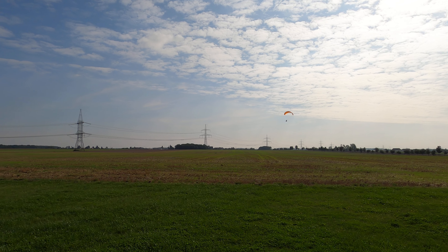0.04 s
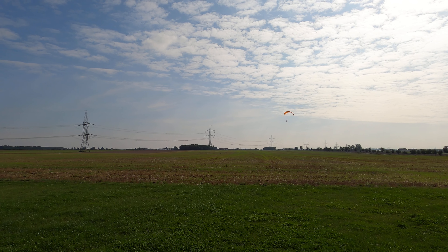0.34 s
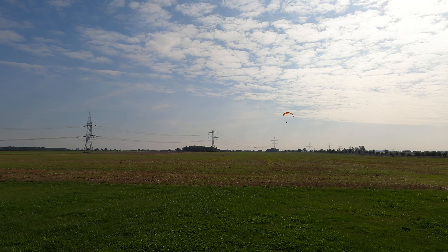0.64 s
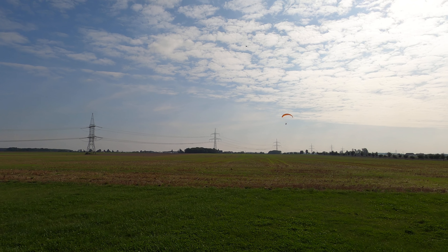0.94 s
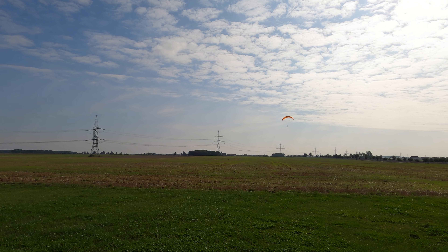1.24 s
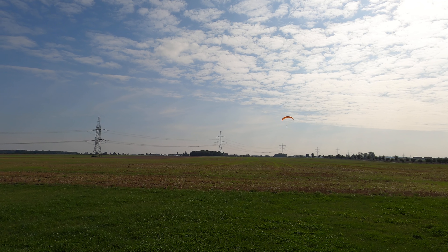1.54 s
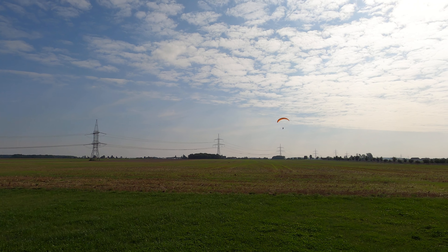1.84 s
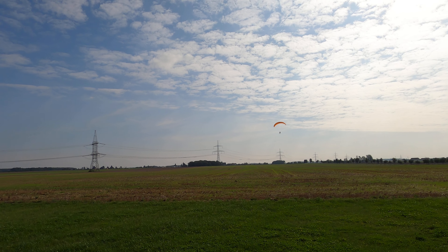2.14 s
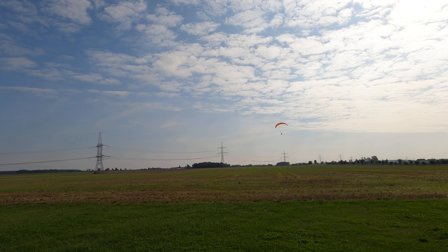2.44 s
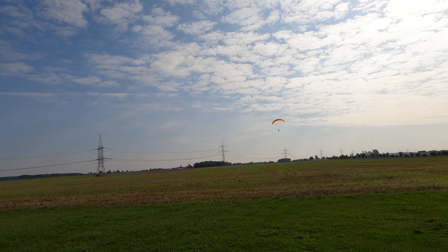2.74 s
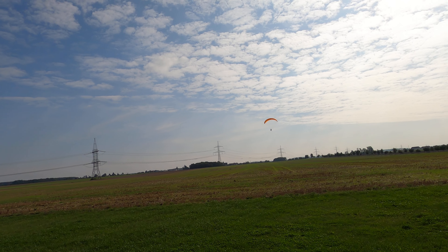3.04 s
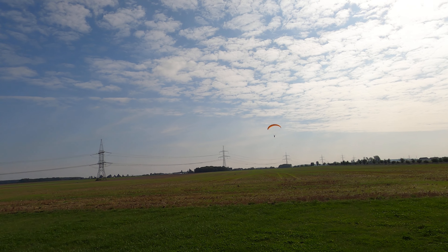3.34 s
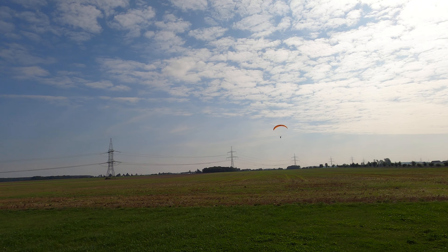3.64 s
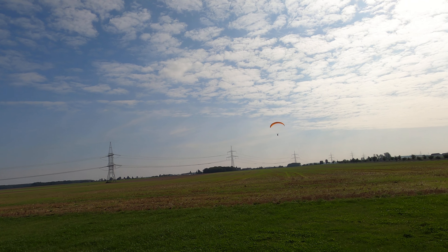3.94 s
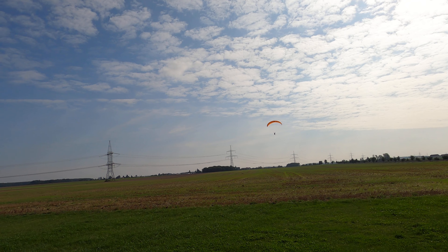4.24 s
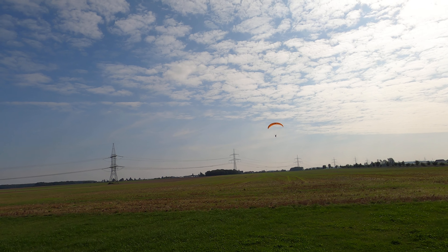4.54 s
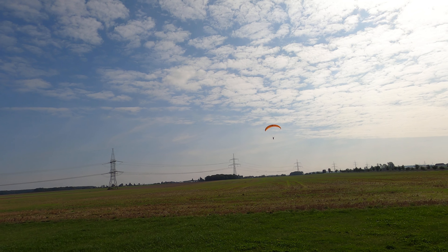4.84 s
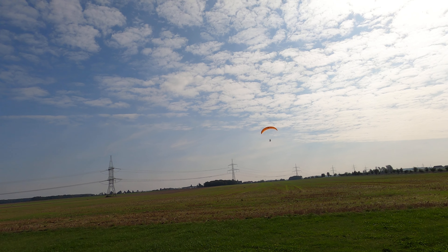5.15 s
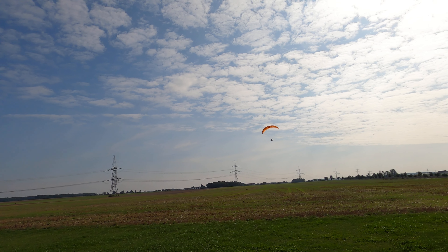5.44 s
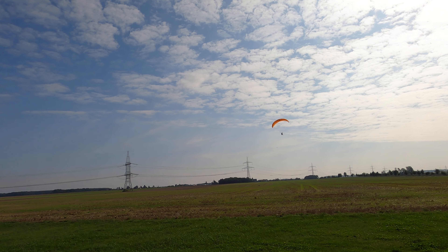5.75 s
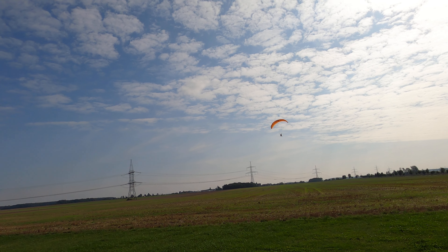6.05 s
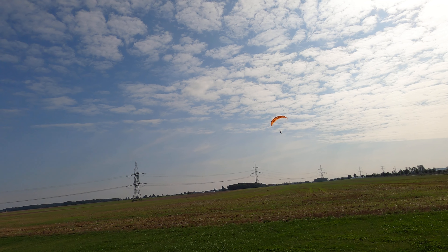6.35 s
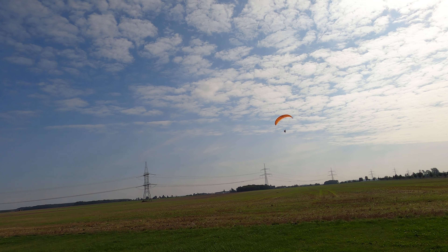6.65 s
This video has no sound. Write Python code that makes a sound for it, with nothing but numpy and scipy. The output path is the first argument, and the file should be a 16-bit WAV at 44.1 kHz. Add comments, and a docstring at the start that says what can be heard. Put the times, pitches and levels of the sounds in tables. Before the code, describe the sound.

Wind buffets the microphone in an open field with low, uneven rumbles and soft thumps, mostly on the left. Beneath it a distant powered paraglider drones faintly, its propeller hiss slowly brightening as it approaches. A soft tick and a few very faint bird chirps pass midway. The hardest gust hits late, and just afterwards the engine drops slightly in pitch while the gusts continue.

```python
"""Wind buffets the microphone in an open field, over the faint drone and rush of a powered paraglider.
The glider approaches high overhead and throttles back a little near the end. Its propeller rush mixes
with its own ground reflection, so that broad notches sweep slowly downwards. The gusts rumble hardest
on the exposed left port of the stereo pair. A few soft ticks and a far bird's chirps lie behind."""
import sys
import numpy as np
from scipy import signal
from scipy.fft import rfft, irfft, next_fast_len
from scipy.io import wavfile
from scipy.ndimage import uniform_filter1d

SR = 44100
rng = np.random.default_rng(int(sys.argv[2]) if len(sys.argv) > 2 else 0)


def generate_wav(signal):
    """Clip the signal to [-1, 1] and save it as 16-bit WAV at the path in sys.argv[1]."""
    frames = np.transpose(np.atleast_2d(signal))
    scaled = np.clip(frames, -1, 1) * 32767
    pcm = np.round(scaled).astype(np.int16)
    wavfile.write(sys.argv[1], SR, pcm)


N = 300321
TIME = np.arange(N) / SR
SIZE = next_fast_len(N)
FREQS = np.maximum(np.arange(SIZE // 2 + 1) * SR / SIZE, 1)

# the hardest eddies that strike the left port: t/s, level/dB, centre f/Hz
BUFFETS = [(0.042, -26, 85), (0.192, -18.5, 87), (0.211, -19.5, 88), (0.246, -20.5, 86.4),
           (0.318, -20, 85.4), (0.336, -19.5, 93), (0.384, -30, 93), (0.428, -24, 85.5),
           (0.448, -28.5, 146), (0.627, -22.5, 88), (0.652, -29, 120), (0.743, -31, 121),
           (0.759, -20.5, 89), (1.039, -28, 97), (1.105, -28.5, 116), (1.431, -22, 126),
           (1.488, -20.5, 111), (1.532, -19.5, 135), (1.702, -22.5, 83), (1.764, -20.5, 85.5),
           (1.788, -15.5, 100), (1.832, -19, 103), (1.909, -16, 110.5), (2.011, -21.5, 85),
           (2.111, -14.5, 115), (2.136, -21.5, 76), (2.235, -19.5, 77.4), (3.215, -22, 51.6),
           (3.335, -16, 76), (3.369, -28, 114), (3.446, -14.5, 93), (3.459, -19.5, 119),
           (3.491, -25.5, 108), (3.532, -14.5, 128.3), (3.701, -12.5, 112.6), (3.827, -20.5, 82),
           (3.863, -27, 128), (3.911, -20, 94), (3.98, -22, 107), (4.776, -17, 119), (4.885, -26, 127),
           (4.922, -17.5, 85), (4.94, -13.5, 132), (4.957, -19, 200), (4.974, -3.5, 207.4),
           (4.994, -9, 159), (5.019, -11, 146), (5.037, -11.5, 154), (5.063, -7.5, 120), (5.091, -19, 118),
           (5.164, -13.5, 122.5), (5.719, -17, 113), (5.743, -22.5, 166), (5.763, -23.5, 117),
           (5.856, -21.5, 100), (5.915, -9.5, 97), (5.937, -14.5, 86), (6.004, -17, 145), (6.073, -19, 109)]


def engine_firing(unsteadiness=0.00092):
    """The engine runs almost steadily, then throttles back: firing phase, firing rate, drone level."""
    # t/s, firing f/Hz, drone level/dB
    throttle = [(0, 145.3, -9.5), (1.2, 145.1, -0.5), (2.2, 144.5, -2.5), (3.2, 145.5, 3), (3.9, 145.4, 3),
                (4.2, 144.4, 4), (4.48, 145, 6), (4.73, 146.1, 4.5), (4.81, 144.8, -3), (4.95, 144.2, 6.5),
                (5.06, 144.6, 1), (5.11, 140.3, 1), (5.2, 134, 0), (5.45, 134.5, 3.5), (5.68, 134.3, -3),
                (6.15, 135, 2), (6.35, 133.9, 1), (6.6, 134.3, 5.5), (6.81, 134.5, -1.5)]
    firing_hz, level_db = in_time(throttle)
    phase = 2 * np.pi * np.cumsum(firing_hz * (1 + unsteadiness * drift(8.4))) / SR
    return phase, firing_hz, level_db


def exhaust_drone(phase, firing_hz, level_db, waver_db=2.06, half_order_db=-15):
    """Exhaust harmonics waver in the moving air, the high ones smeared most."""
    # exhaust colour from far below: f/Hz, level/dB
    colour = [(140, -70.5), (280, -90), (430, -88), (580, -79.5), (720, -82.5), (810, -79), (870, -85),
              (940, -74), (1010, -72), (1080, -73), (1160, -76.5), (1320, -80), (1450, -81), (1700, -82.5),
              (2100, -100), (3200, -100)]
    out = np.zeros(N)
    smear_rad = 0.011 + 0.0045 * (firing_hz.max() - firing_hz)   # less even when throttled back
    for k in range(1, 21):
        harmonic = np.sin(k * (phase + smear_rad * drift(11.4)) + 2 * np.pi * rng.random())
        half_order = from_db(half_order_db) * np.sin((k + .5) * phase + 2 * np.pi * rng.random())
        harmonic_db = at_hz(colour, k * firing_hz)[0] + waver_db * drift(3.2)
        out += from_db(harmonic_db) * (harmonic + half_order)
    return np.sqrt(2) * from_db(level_db) * out


def propeller_rush(phase, split_hz=5000, throb=0.17, sharpness=11.0, uneven=0.85, flutter_db=0.5):
    """Two unrelated streams of propeller noise pulse with each firing; the treble grows as it nears."""
    # t/s, body level/dB, treble level/dB
    approach = [(0.0, -63.5, -77), (0.7, -66.5, -74.5), (0.9, -64, -75.5), (1.2, -62, -75),
                (1.55, -63.5, -70), (1.9, -65, -70.5), (2.25, -63, -72.5), (2.5, -60.5, -72),
                (2.82, -60.5, -68.5), (3.55, -60.5, -67.5), (4.48, -59, -66.5), (5.0, -60.5, -68),
                (5.3, -62.5, -69), (5.58, -60.5, -67), (5.92, -60, -65.5), (6.81, -60.5, -68.5)]
    # colour of the rush: f/Hz, level/dB
    colour = [(100, 12.5), (350, 4.5), (700, -1), (1100, 4), (1500, 2), (1950, 1.5), (2350, 3), (2800, 0),
              (3300, 2.5), (3900, 3), (4800, -2), (5250, -3), (5900, -5.5), (6500, -6), (7850, -11),
              (8650, -9), (10600, -18.5), (12500, -24), (14700, -33)]
    body_db, treble_db = in_time(approach)
    low_share = lowpass(split_hz, 8)
    firings = np.exp(sharpness * np.cos(phase)) * (1 + uneven * np.cos(phase / 2))   # strong, then weak
    pulsing = rms_one(1 + throb * rms_one(firings))
    streams = []
    for _ in range(2):
        body = from_db(body_db + 2.0) * noise(gains(colour) * np.sqrt(low_share))
        treble = from_db(treble_db + 3.5) * noise(gains(colour) * np.sqrt(1 - low_share))
        streams.append(body + treble)
    return np.array(streams) * pulsing * from_db(flutter_db * drift(8.8))


def over_ground(direct, scatter_above_hz=4600, scatter_db_per_ms=10):
    """The ground reflection trails further behind the direct sound, and dulls, as the glider rises."""
    # reflection at the microphone: t/s, delay/ms, relative strength
    bounce = [(0, 1.11, 0.38), (0.8, 1.16, 0.51), (1.15, 1.19, 0.28), (2.0, 1.25, 0.52), (2.6, 1.32, 0.22),
              (3.2, 1.32, 0.34), (3.8, 1.4, 0.16), (4.4, 1.56, 0.3), (4.7, 1.54, 0.35), (5.0, 1.7, 0.34),
              (5.3, 1.8, 0.63), (5.9, 1.97, 0.42), (6.2, 2.15, 0.34), (6.5, 2.3, 0.44), (6.81, 2.4, 0.42)]
    # what the grass sends back: f/Hz, level/dB
    grass = [(150, -10), (600, -2.5), (1200, 2.5), (2400, 0.5), (4700, -3), (7000, -2.5), (12000, -12)]
    delay_ms, strength = in_time(bounce)
    earlier = TIME - delay_ms / 1000
    straight = np.interp(earlier, TIME, filtered(direct, gains(grass)))
    turned = np.interp(earlier, TIME, filtered(direct, -1j * gains(grass)))
    lag_rad = 3.25 - 1.31 * delay_ms   # soft ground turns the phase, less as the angle steepens
    echo = np.cos(lag_rad) * straight + np.sin(lag_rad) * turned
    dull = filtered(echo, lowpass(scatter_above_hz, 8))
    treble_kept = from_db(-scatter_db_per_ms * (delay_ms - delay_ms.min()))   # grass scatters the rest
    return direct + strength * (dull + (echo - dull) * treble_kept)


def swells_and_brushes():
    """Narrow bands of noise swell and fade, with three faint, brushing ticks."""
    # the three shortest are the ticks: t/s, half length/s, level/dB, centre f/Hz, half width/Hz
    bands = [(1.55, 0.27, -66.5, 1500, 230), (1.597, 0.14, -72, 3930, 200),
             (2.497, 0.043, -65, 1550, 200.4), (2.837, 0.1, -65.5, 396, 60), (4.206, 0.1, -69, 485, 109.9),
             (4.95, 0.12, -63.5, 1580, 130), (5.365, 0.018, -59.5, 1150, 330),
             (5.444, 0.093, -69, 1000, 100), (5.533, 0.0074, -55, 943, 330),
             (6.284, 0.0078, -58.5, 945, 380.3), (6.5, 0.23, -72.5, 840, 80)]
    out = np.zeros(N)
    for at, half_s, db, hz, half_hz in bands:
        out += from_db(db) * bell(TIME, at, half_s) * noise(bell(FREQS, hz, half_hz))
    return out


def rush_arch(half_width_hz=110):
    """A narrow band of the rush glides up and back as it swells."""
    # t/s, centre f/Hz, level/dB
    glide = [(5.26, 1450, -71), (5.37, 1540, -63), (5.44, 1710, -60.5), (5.5, 1690, -65), (5.62, 1560, -64),
             (5.74, 1460, -66), (5.85, 1400, -79)]
    hz, db = in_time(glide)
    band = noise(bell(FREQS, 0, half_width_hz))
    sounding = (TIME > glide[0][0]) & (TIME < glide[-1][0])
    return sounding * from_db(db) * np.sqrt(2) * band * np.sin(2 * np.pi * np.cumsum(hz) / SR)


def hiss_dip(x, at_s=5.16, half_s=0.07, depth_db=-4.5, centre_hz=5600, half_width_hz=1100):
    """One band of the hiss sinks briefly and comes back."""
    band = filtered(x, bell(FREQS, centre_hz, half_width_hz))
    return x + band * (from_db(depth_db * bell(TIME, at_s, half_s)) - 1)


def wind():
    """Each port has its own rumble; the upper part of the left port's buffeting crosses to the right."""
    # left port into right channel: f/Hz, level/dB
    crossfeed = [(40, -47), (90, -33.5), (130, -12), (180, -2), (240, -3.5), (330, 2.5), (600, 10.5),
                 (1000, -17), (3000, -29)]
    exposed, sheltered = gust_strength()
    left = from_db(1.02) * rumble(exposed) + puffs(BUFFETS, swings=5.55)
    left += puffs(eddies(exposed * liveliness(exposed)), swings=5.3)
    left = np.tanh(left)   # the hardest eddies overdrive the port and gain an edge
    right = from_db(-1.0) * rumble(sheltered)
    crossed = filtered(left, 1j * gains(crossfeed))   # a quarter cycle early
    return np.array([left, right + crossed])


def gust_strength(calm_db=-54.5, fall_db_per_s=262, surge_db=-6, surge_half_s=0.01444):
    """Gusts rise, hold and fall back, one gain for each port; the left surges round its hard eddies."""
    # start t/s, end t/s, exposed left level/dB, sheltered right level/dB, rise/(dB per s)
    gusts = [(0.055, 0.096, -28, -40, 403), (0.167, 0.459, -30, -38.5, 152),
             (0.465, 0.548, -34.5, -40, 200), (0.552, 0.812, -33, -39.5, 200),
             (0.84, 0.934, -46.5, -43, 196), (1.052, 1.077, -34, -45, 400), (1.335, 1.4, -44, -58, 86),
             (1.45, 1.72, -32.5, -47, 110), (1.712, 2.358, -33.5, -43.5, 198),
             (2.635, 3.116, -37.5, -44, 130), (3.192, 3.248, -27.5, -45, 108),
             (3.289, 3.552, -28, -44, 200), (3.572, 4.025, -31.5, -47, 200), (4.21, 4.265, -36, -46, 162),
             (4.649, 4.674, -29.5, -40, 199), (4.731, 4.775, -29, -39, 300),
             (4.937, 5.066, -21, -32.5, 381), (5.138, 5.131, -23, -33, 400), (5.3, 5.584, -48.5, -49, 100),
             (5.731, 5.778, -28, -35, 380), (5.848, 5.895, -25, -42, 250), (6.054, 6.14, -27.5, -38, 300),
             (6.47, 6.508, -36.5, -60, 250), (6.793, 6.813, -42.5, -57, 150)]
    t = TIME[::50]
    db = np.full((2, len(t)), calm_db)
    for start, end, left_db, right_db, rise in gusts:
        fade_db = rise * np.maximum(start - t, 0) + fall_db_per_s * np.maximum(t - end, 0)
        db = np.maximum(db, [left_db - fade_db, right_db - fade_db])
    left, right = from_db(db)
    for at, eddy_db, hz in BUFFETS:
        drag = min(1, 112 / hz) ** 2   # slow, wide eddies drag the most air along
        left = np.maximum(left, from_db(eddy_db + surge_db) * drag * bell(t, at, surge_half_s))
    return np.interp(TIME, t, left), np.interp(TIME, t, right)


def rumble(gust, lumpy_db=7.0, deep_below_hz=45):
    """Turbulence tumbles over a port, as strong as the gust; slow air keeps only the deepest part."""
    # colour of the turbulence: f/Hz, level/dB
    colour = [(10, -7), (25, 1.5), (55, 5.5), (90, -5), (130, -18), (190, -25), (300, -55), (450, -70),
              (2000, -130)]
    flow = noise(gains(colour)) * from_db(lumpy_db * drift(3.7))
    power = uniform_filter1d(uniform_filter1d(flow ** 2, size=SR // 25), size=SR // 25)
    flow = rms_one(flow / np.sqrt(power + 1e-6))   # evened out, so the gust sets the strength
    deep = filtered(flow, lowpass(deep_below_hz, 6))
    return gust * (deep + (flow - deep) * liveliness(gust))


def eddies(gust, per_s=27, full_scale_hz=240, octaves_per_db=0.055, spread_octaves=0.078):
    """Small eddies at loose intervals, as strong and quick as their gust: t/s, level/dB, f/Hz."""
    count = int(per_s * N / SR)
    late, size, pitch = rng.standard_normal((400, 3))[:count].T
    at = np.clip((np.arange(count) + .5 * late) / per_s, 0, TIME[-1])
    gust_db = 20 * np.log10(np.interp(at, TIME, gust))
    level_db = gust_db + 1 + 2 * size
    hz = full_scale_hz * 2 ** (octaves_per_db * gust_db + spread_octaves * pitch)
    return np.transpose([at, level_db, hz])


def liveliness(gust, full_gust_db=-26, dulling=0.58):
    """Share of quick motion that the air keeps: 1 in a full gust, less as it slows."""
    return np.minimum(gust / from_db(full_gust_db), 1) ** dulling


def puffs(rows, swings):
    """Short swings of pressure, about one cycle long, each with a chance shape and fading skirts."""
    out = np.zeros(N)
    for (at, db, hz), turn in zip(rows, rng.random(len(rows))):
        near = slice(max(int(at * SR) - SR // 20, 0), int(at * SR) + SR // 20)
        age = TIME[near] - at
        pulse = (1 - 2j * np.pi * hz * age / (swings - .5)) ** -swings
        skirts = np.cos(10 * np.pi * age) ** 2
        out[near] += from_db(db) * skirts * np.real(np.exp(2j * np.pi * turn) * pulse)
    return out


def handling_tick():
    """Handling gives one soft tick."""
    # t/s, level/dB, centre f/Hz
    ticks = [(2.286, -43.5, 635)]
    return puffs(ticks, swings=4.4)


def far_bird(waver=0.009, flicker_db=2.2):
    """Thin gliding notes from far off swell and fade, a little unsteady in pitch and strength."""
    # start t/s, length/s, from f/Hz, to f/Hz, level/dB
    chirps = [(2.615, 0.17, 2430, 2990, -68.5), (2.805, 0.073, 2600, 2480, -66),
              (2.866, 0.53, 2360, 2240, -76), (3.685, 0.16, 2760, 2770, -71),
              (3.946, 0.15, 2790, 2810, -71)]
    out = np.zeros(N)
    unsteady = 1 + waver * drift(119.0)
    for start, length, from_hz, to_hz, db in chirps:
        progress = np.clip((TIME - start) / length, 0, 1)
        hz = (from_hz + (to_hz - from_hz) * progress) * unsteady
        out += 2 * from_db(db) * np.sin(np.pi * progress) * np.sin(2 * np.pi * np.cumsum(hz) / SR)
    return out * from_db(flicker_db * drift(35.0))


def open_field(level_db=-69):
    """The far background of the field: a steady low murmur with a little hiss."""
    # f/Hz, level/dB
    colour = [(40, 10), (150, 10), (380, -10), (800, -10.5), (3000, -17), (6000, -5.5), (11000, -30),
              (14000, -44)]
    return from_db(level_db) * noise(gains(colour))


def microphone_pair(ahead, scattered):
    """Sound from ahead reaches the right port first; scattered sound makes the two differ."""
    # f/Hz, likeness (0-1), right lead/rad, left minus right level/dB
    ports = [(101, 0.58, 0.14, -2.5), (600, 0.7, 0.26, -0.5), (1260, 0.71, 0.55, -1), (2620, 0.91, 0.88, 0),
             (2750, 0.4, 0.95, 2), (3330, 0.85, 0.51, -4.5), (3930, 1, 0.83, 3), (4700, 0.84, 1.58, -1),
             (6450, 0.55, 2.07, -4), (8000, 1, 2.18, 0), (8780, 0.5, 1.68, -5.5), (9100, 1, 2.15, -5.5),
             (11200, 0.6, 1.93, -4.5), (13300, 0.1, 3.1, -7)]
    alike, lead_rad, balance_db = at_hz(ports)
    shared = filtered(ahead, np.sqrt((1 + alike) / 2))
    apart = filtered(scattered, np.sqrt(np.maximum(1 - alike, 0) / 2))
    skew = from_db(balance_db / 2) * np.exp(-.5j * lead_rad)
    return np.array([filtered(shared + apart, skew), filtered(shared - apart, 1 / skew)])


def from_db(db):
    """Decibels to gain."""
    return 10 ** (np.asarray(db) / 20)


def rms_one(x):
    """Scale to rms 1."""
    return x / np.sqrt(np.mean(np.abs(x) ** 2) + 1e-20)


def bell(x, centre, half_width):
    """A Gaussian bump of height 1."""
    return np.exp(-.5 * ((x - centre) / half_width) ** 2)


def lowpass(corner_hz, order):
    """A response that falls to one half at the corner."""
    return 1 / (1 + (FREQS / corner_hz) ** order)


def in_time(rows):
    """Each column of a curve, at every sample."""
    times, *columns = np.transpose(rows)
    return [np.interp(TIME, times, column) for column in columns]


def at_hz(rows, hz=FREQS):
    """Each column of a spectrum, interpolated in log frequency."""
    points, *columns = np.transpose(rows)
    return [np.interp(np.log(hz), np.log(points), column) for column in columns]


def gains(spectrum):
    """A dB spectrum as a gain at every frequency."""
    return from_db(at_hz(spectrum)[0])


def filtered(x, response):
    """Apply a frequency response."""
    return irfft(rfft(x, SIZE) * response, SIZE)[..., :N]


def noise(response):
    """Coloured noise of rms 1."""
    return rms_one(filtered(rng.standard_normal(N), response))


def drift(rate_hz, step=40, run_in=2000):
    """Slow random wander of rms 1: coarse noise smoothed twice."""
    pole = np.exp(-2 * np.pi * step * rate_hz / SR)
    coarse = rng.standard_normal(N // step + run_in + 2)
    slow = signal.lfilter([1], [1, -2 * pole, pole * pole], coarse)[run_in:]
    return np.interp(np.arange(N) / step, np.arange(len(slow)), rms_one(slow))


def scene():
    """Glider, field and small sounds through the microphone pair, with the wind on top."""
    phase, firing_hz, drone_db = engine_firing()
    rush_ahead, rush_scattered = propeller_rush(phase)
    field_ahead, field_scattered = open_field(), open_field()
    glider = over_ground(rush_ahead + exhaust_drone(phase, firing_hz, drone_db))
    ahead = glider + swells_and_brushes() + rush_arch() + field_ahead + far_bird() + handling_tick()
    scattered = over_ground(rush_scattered) + field_scattered
    return hiss_dip(microphone_pair(ahead, scattered)) + wind()


def record(dry, fade_in_s=0.003, cutoff_hz=14700):
    """The sound opens softly and the top is cut steeply."""
    opening = np.minimum(TIME / fade_in_s, 1)
    top_cut = signal.ellip(10, .1, 70, cutoff_hz, fs=SR, output="sos")
    return signal.sosfilt(top_cut, dry * opening)


dry = scene()
out = record(dry)
generate_wav(out)
```